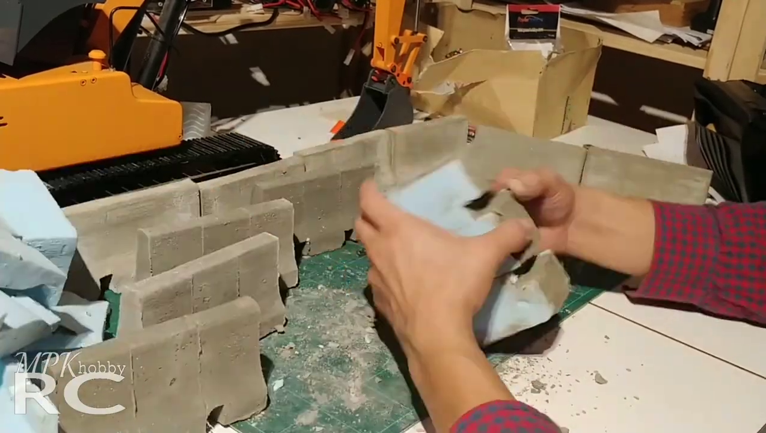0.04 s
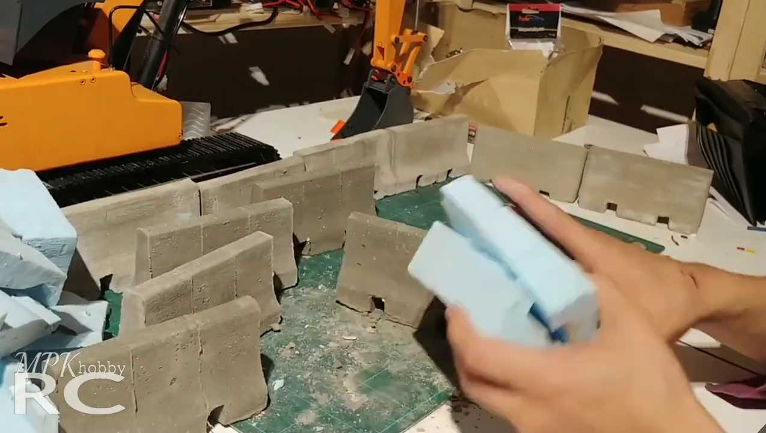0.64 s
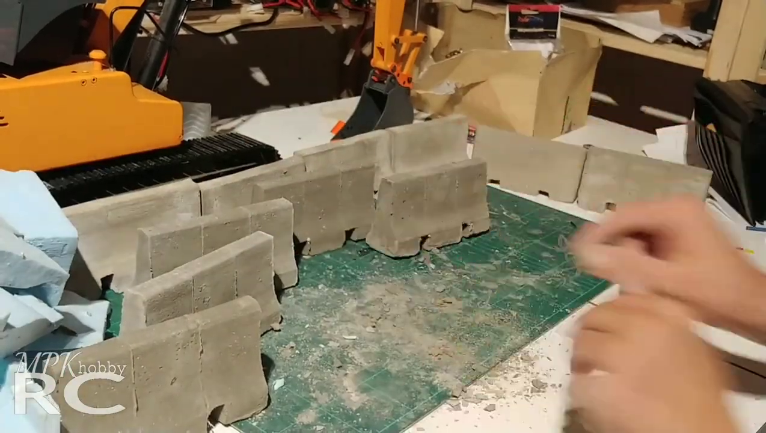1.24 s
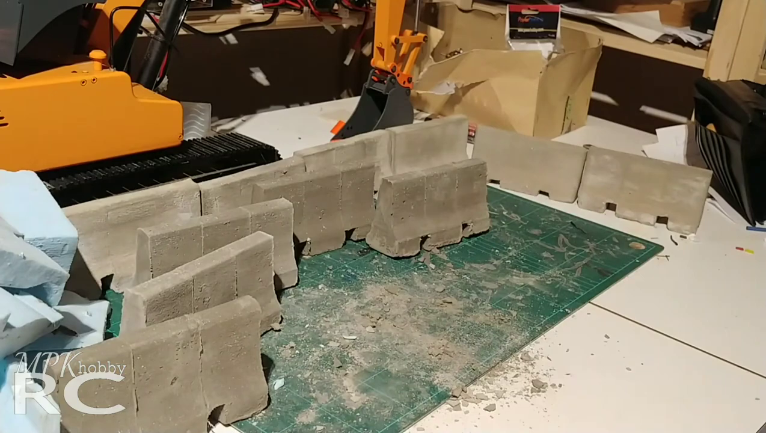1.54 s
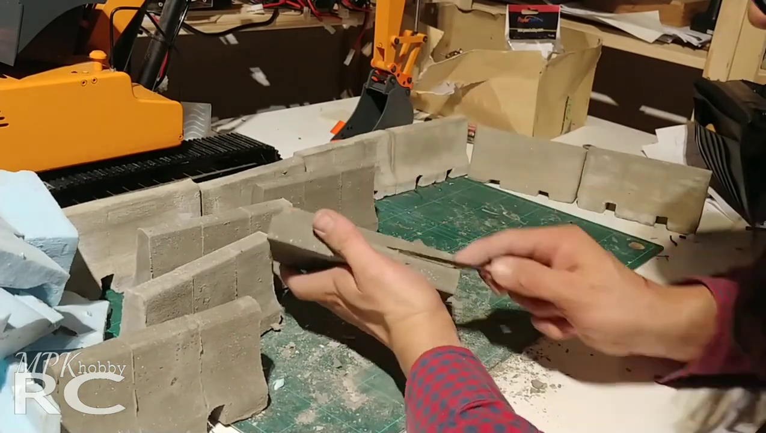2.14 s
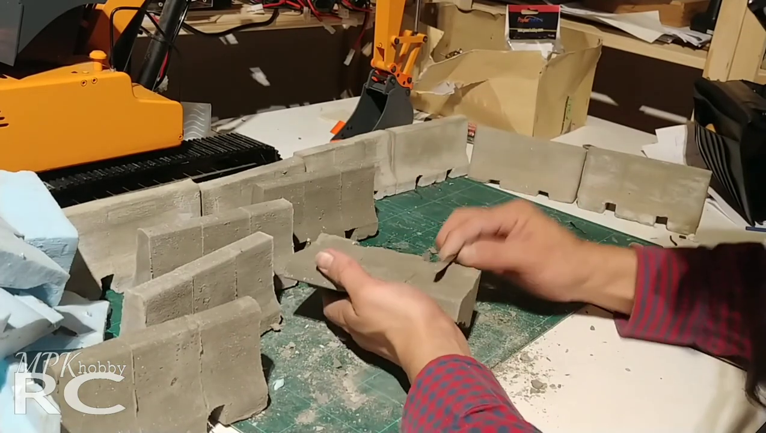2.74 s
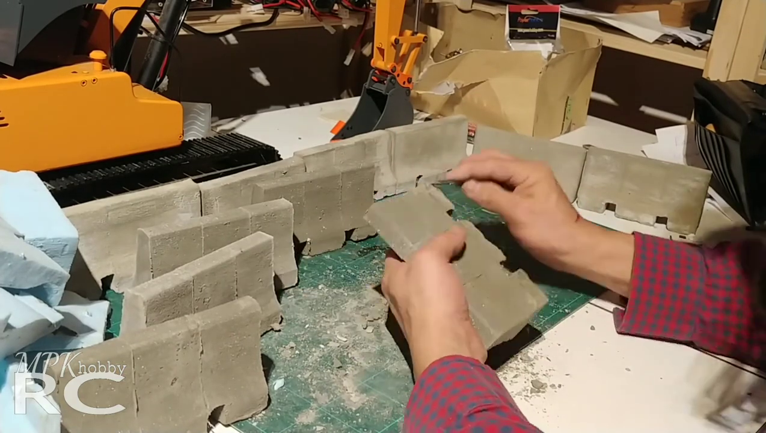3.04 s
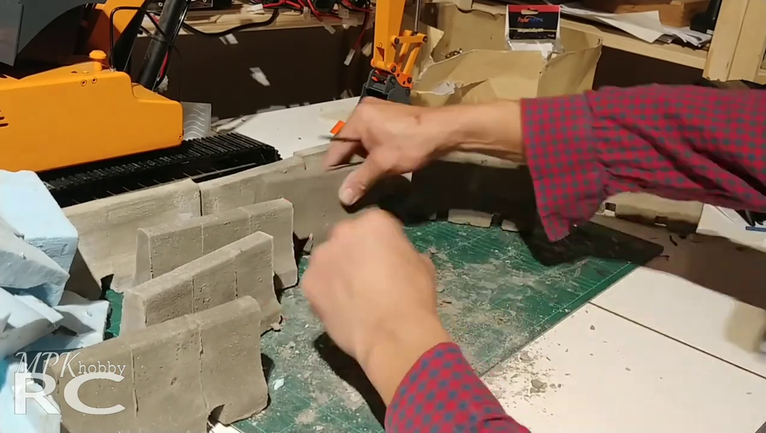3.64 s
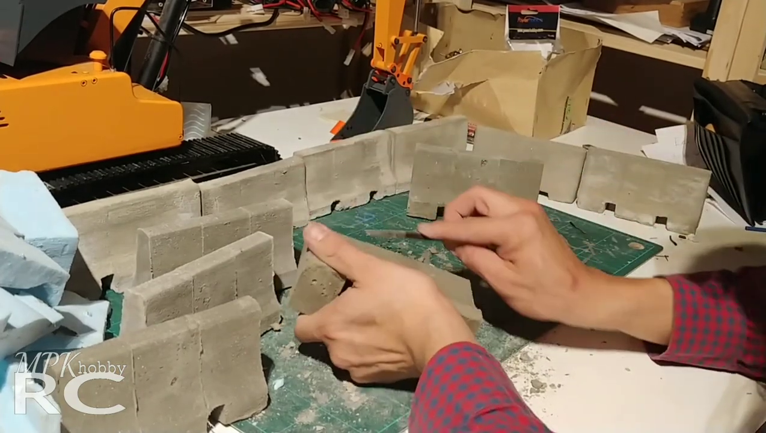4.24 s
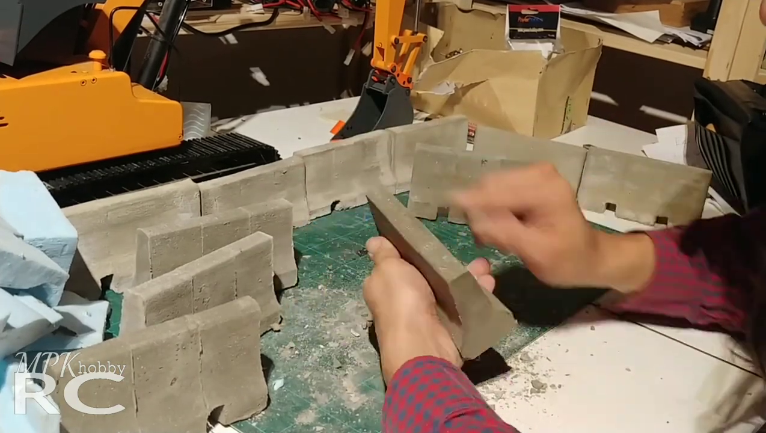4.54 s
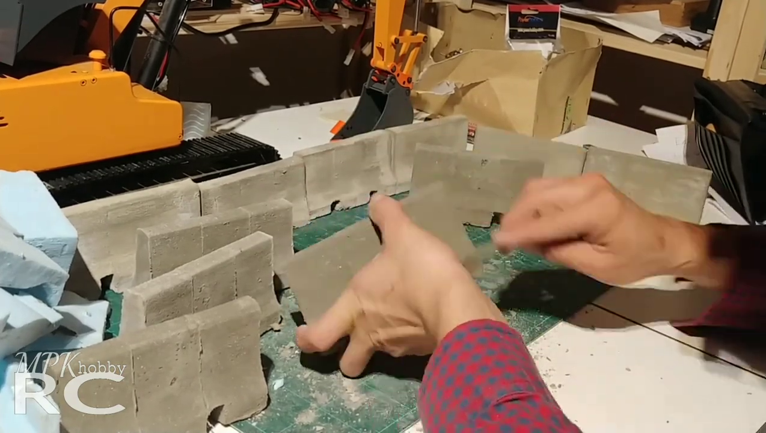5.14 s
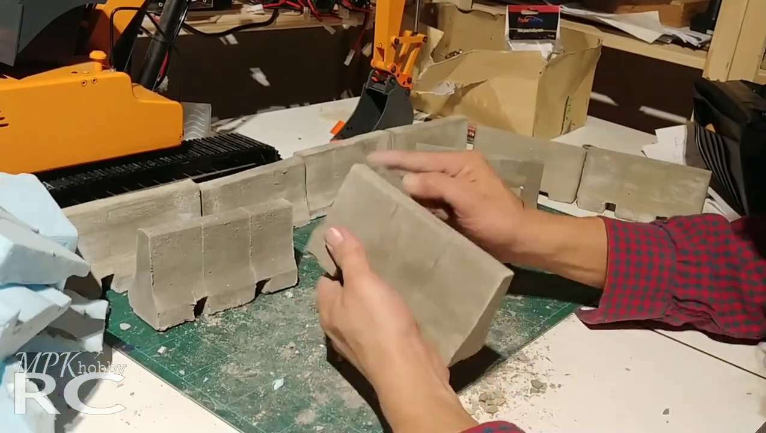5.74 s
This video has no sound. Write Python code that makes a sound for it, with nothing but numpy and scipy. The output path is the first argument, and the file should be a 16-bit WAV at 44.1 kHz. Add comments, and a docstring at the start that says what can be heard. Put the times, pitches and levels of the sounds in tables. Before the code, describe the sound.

Foam rubs dryly against a small cement piece as it comes out of its mold, and the piece lands on a workbench mat with a sharp clack. After a few soft bumps, a small tool scrapes its edges in quick strokes, with clicks and brief pings as burrs snap off. A dull thud interrupts, then grittier scraping resumes. The sound is close, a little to the left, in a quiet room.

```python
"""Demoulding and deburring cement

A small cast cement barrier is pulled from its squeezing foam mould, clacks down and thuds on a bench mat.
Then a small tool scrapes the burrs off the pieces in quick strokes; each rings briefly, damped by the hand.
Sleeves rustle in a quiet, cluttered room. The stereo image is close, its right side shaded from the work."""
import sys
import numpy as np
from scipy import signal
from scipy.fft import rfft, irfft, next_fast_len
from scipy.io import wavfile
from scipy.ndimage import map_coordinates

SR = 44100
rng = np.random.default_rng(int(sys.argv[2]) if len(sys.argv) > 2 else 0)


def generate_wav(signal):
    """Clip the signal to [-1, 1] and save it as 16-bit WAV at the path in sys.argv[1]."""
    frames = np.transpose(np.atleast_2d(signal))
    scaled = np.clip(frames, -1, 1) * 32767
    pcm = np.round(scaled).astype(np.int16)
    wavfile.write(sys.argv[1], SR, pcm)


N = 255780

# Firm strokes of the tool: (centre [s], level [dB], half length [s])
FIRM_STROKES = [(1.616, -49, .011), (1.68, -49, 0.0055), (1.779, -54.5, 0.0076), (1.841, -50, 0.0034),
                (1.875, -46, 0.0097), (1.915, -51.5, 0.0065), (2.179, -48.5, .015), (2.311, -40.5, 0.01),
                (2.383, -40, 0.01), (2.448, -34.5, 0.0062), (2.522, -35, 0.012), (2.568, -31.5, 0.0084),
                (2.614, -41.5, 0.0092), (2.703, -33, 0.018), (2.773, -29, 0.012), (2.856, -35.5, 0.028),
                (2.917, -36, 0.005), (2.96, -47, 0.0097), (3.028, -43.5, 0.0041), (3.119, -57, 0.0087),
                (3.219, -45, 0.004), (3.823, -46.5, 0.0086), (3.894, -44.5, 0.016), (3.977, -40, 0.014),
                (4.055, -44.5, .019), (4.194, -44.5, 0.017), (4.427, -49, 0.011), (4.448, -53.5, 0.019),
                (4.49, -50.5, 0.011), (4.542, -44.5, 0.0061), (4.583, -50.5, 0.0052), (4.617, -47.5, 0.017),
                (4.696, -37.5, 0.014), (4.746, -55.5, 0.0049), (4.886, -42.5, 0.0097), (4.91, -38, 0.009),
                (4.962, -45, 0.015), (5.027, -53, 0.017), (5.161, -54.5, 0.01), (5.213, -45.5, 0.011),
                (5.261, -52.5, 0.0031), (5.552, -32.5, 0.0064), (5.59, -44.5, 0.022),
                (5.635, -41.5, 0.0097), (5.685, -45, 0.0034), (5.753, -45, 0.0046), (5.777, -34, 0.0084)]
# Edges worked in turn: (start [s], end [s], lowest mode [Hz], brightness [dB], grit [dB], light strokes [dB])
WORKED_EDGES = [(1.596, 1.93, 2085, 1.5, -23, -59), (2.147, 2.421, 2068, -8, -22.5, -56.5),
                (2.434, 2.79, 2016, -5, -27.5, -50.5), (2.807, 3.05, 2024, -9.5, -31.5, -58.5),
                (3.094, 3.25, 2090, -6, -28, -63), (3.773, 3.93, 1749, -9, -10, -55),
                (3.939, 4.3, 1800, .5, -11, -60), (4.365, 4.77, 1860, 0, -6, -58),
                (4.849, 5.1, 1654, -11.5, -39, -57), (5.143, 5.38, 1670, -3.5, -15, -61.5),
                (5.532, 5.71, 2328, 0, -17, -55.5), (5.716, 5.8, 2345, -7.5, -38.5, -50)]
# The tool catches on a burr: (time [s], level [dB])
BURR_CATCHES = [(2.375, -29.5), (2.557, -28), (2.697, -20), (2.704, -22), (2.71, -22), (2.7945, -23.5),
                (2.855, -42), (2.8744, -23), (3.777, -50), (3.989, -28.5), (4.443, -37), (4.696, -34),
                (4.875, -41.5), (5.534, -24.5), (5.749, -37)]
# Ring of the piece, one list per hold: (frequency [Hz], width before hand damping [Hz], level [dB])
PIECE_MODES = [
    [(2060, 40, 15), (930, 180, 1), (3592, 45, 1), (4720, 31, -6), (5270, 130, -17), (7220, 62, -9.5),
     (8200, 70, -17), (9000, 63, -20.5)],
    [(2000, 69, 3), (2960, 21, -16.5), (3068, 43, -9.5), (3550, 70, -13.5), (4570, 87, -15),
     (5420, 79, -13.5), (5900, 55, -19), (7320, 35, -25), (7700, 30, -46)],
    [(1700, 55, 14), (2184, 110, -6.5), (2576, 37, 3.5), (2940, 81, -0.5), (3820, 88, -5), (4790, 26, -5),
     (5520, 79, -8.5), (5920, 24, -14.5), (7870, 250, -17.5), (7930, 63, -38)],
    [(2310, 57, 16.5), (3720, 168, -3), (4153, 46, 3.5), (5340, 96, -3), (6500, 33, -4.5), (6970, 73, -10),
     (7880, 250, -15.5)],
]
# The ring of the worked piece changes to the next list: (time [s])
HOLD_CHANGES = [2.05, 3.6, 5.45]
# Gritty hiss of scraping, also the colour of the sleeves: (frequency [Hz], level [dB])
GRIT_COLOUR = [(60, -21.5), (250, -8.5), (700, -3.5), (1200, 4), (2200, 1.5), (4000, -1), (5700, -6),
               (6600, -10), (8000, -8), (8800, -17.5), (11000, -18), (12500, -29.5)]
# Cement knocks on cement: (time [s], level [dB], brightness [dB], t60 [s])
CEMENT_CLACKS = [(0.246, -35, -16, 0.066), (0.724, -25, -15, 0.11), (0.736, -6.5, -21, .034),
                 (0.7405, -9.5, -5, 0.051), (0.773, -22, -0.5, .018), (1.034, -57, -18.5, 0.084),
                 (1.273, -49.5, -9, 0.048), (3.304, -52.5, -15.5, 0.033), (3.508, -57.5, -7, 0.12)]
# Colour of a clack: (frequency [Hz], level [dB])
CEMENT_COLOUR = [(20, -48), (60, -37.5), (280, -22.5), (405, -5), (520, -16.5), (750, -11.5), (1000, -9),
                 (1350, 0.5), (1750, 0), (2200, -8.5), (2700, -8), (4200, -12), (5400, -17.5),
                 (7500, -24.5), (12000, -46.5)]
# Dull bumps on the mat or in the hands: (time [s], level [dB], tone centre [Hz], contact cutoff [Hz])
SOFT_BUMPS = [(0.248, -36, 220, 920), (0.381, -35, 900, 1250), (0.404, -28.5, 148, 565),
              (0.445, -46, 120, 200), (0.596, -57, 290, 397.6), (0.735, -37.5, 408, 480),
              (0.767, -49.5, 120, 402), (0.803, -52, 200, 580), (1.033, -32.5, 288, 426),
              (1.264, -44.5, 159, 1310), (1.345, -45, 270, 500), (1.451, -53.5, 417, 1410),
              (1.525, -50, 400, 1400), (2.087, -48.5, 121, 169), (2.696, -51.5, 500, 1160),
              (2.972, -53, 110, 920), (3.299, -52.5, 960, 1304), (3.413, -60, 400, 710),
              (3.498, -26, 265, 550), (3.509, -25, 138.7, 1220), (3.596, -46.5, 280, 385),
              (4.388, -56, 115, 185), (4.99, -47, 524, 1309), (5.045, -54.5, 464, 890),
              (5.564, -51, 170, 450), (5.61, -54.5, 326, 450)]
# Body of the bench top: (frequency [Hz], width [Hz], level [dB])
BENCH_MODES = [(66.16, 25, -16.5), (129, 10, -9.5), (272, 290, -6.5), (416, 68, -5), (556, 60, -9),
               (859, 140, -7), (1060, 470, -5)]
# Foam, fingers and dusty mat slide on cement: (centre [s], level [dB], half length [s], brightness [dB])
FOAM_RUBS = [(0.019, -42.5, 0.007, 8), (0.044, -48, 0.015, 38), (0.119, -56.5, 0.018, 25),
             (0.214, -47, 0.018, -7.5), (0.268, -52, 0.023, 1), (0.396, -23, .011, -6.5),
             (0.511, -52, 0.0087, -17), (0.579, -44.5, .017, 9), (0.622, -45.5, 0.011, 1),
             (0.654, -49, 0.0082, -1.5), (0.699, -57, 0.02, -9), (0.931, -70, .022, 5),
             (1.095, -51, .014, 0), (1.187, -65, 0.0056, 14), (1.32, -61.5, 0.027, -5),
             (1.373, -57.5, 0.032, -2), (1.464, -55, 0.0076, -15.5), (1.55, -60.5, 0.024, -8.5),
             (3.419, -76, 0.03, 5.5), (3.636, -63, 0.027, -4), (5.024, -57, 0.037, -10.5)]
# Colour of a rub: (frequency [Hz], level [dB])
FOAM_COLOUR = [(60, -17), (300, -13.5), (700, -4), (1100, 8), (1600, 1.5), (2200, -7), (4500, -4),
               (6200, -13), (7600, -10), (9500, -17.5), (11500, -24.5), (12500, -36.5)]
# Movement of hands and sleeves: (time [s], rumble [dB], rustle [dB])
HANDLING_LEVELS = [(0.0, -71, -97), (0.34, -63.5, -70), (0.61, -77.5, -62.5), (0.89, -80, -84),
                   (1.66, -73, -95), (2.12, -74.5, -72.5), (2.47, -64, -68.5), (2.7, -74, -84),
                   (2.96, -66.5, -75), (3.21, -74.5, -72), (3.71, -69, -82.5), (4.04, -69, -75.5),
                   (4.23, -66.5, -77), (4.59, -70, -76.5), (4.7, -71.5, -71.5), (5.57, -74.5, -84.5),
                   (5.72, -72, -77), (5.8, -65, -74)]
# Shading of the right microphone for work in the hands: (frequency [Hz], gain [dB])
HAND_SHADE = [(100, 16.5), (350, 1.2), (630, -3), (1130, -2.5), (2040, -9.5), (3660, -15), (6600, -32.5),
              (12000, -13.5)]
# The same for blows on the mat: (frequency [Hz], gain [dB])
MAT_SHADE = [(100, 3.5), (350, -2), (630, 1), (1130, -4.5), (2040, -10), (3660, -19), (6600, -28.5),
             (12000, -20)]
# Decay of the room: (frequency [Hz], t60 [s])
ROOM_DECAY = [(100, 0.095), (400, 0.13), (2000, 0.047), (10000, 0.0067)]
# Room tone: (frequency [Hz], level [dB])
HUSH_COLOUR = [(15, -34.5), (25, -5.5), (115, 3), (231, -7), (314, -3.5), (513, -9), (648, -28),
               (1970, -17), (4610, -27.5), (6460, -35), (7740, -26), (12000, -32), (15600, -68),
               (22000, -120)]

FRAME = 16384  # samples in one event
T = np.arange(FRAME) / SR
HZ = np.fft.rfftfreq(FRAME, 1 / SR)
CENTRE_S = T[FRAME // 2]


def scraping(grip_drift=0.013, brighter_per_db=0.21, mean_stroke_db=-40):
    """The tool scrapes the cement: light strokes mostly hiss, deep ones ring the piece."""
    out = np.zeros(N)
    for s, db, half_s in FIRM_STROKES + light_strokes():
        lowest_hz, treble_db, grit_db = edge_at(s)
        light_db = brighter_per_db * (mean_stroke_db - db)
        lowest_hz *= 1 + grip_drift * rng.standard_normal()
        body = held_piece(s, lowest_hz, grit_db + light_db)
        friction = grains(spread_db=3.5, per_s=1100)
        sound = contact(friction, swell(half_s, shape=1.34), body, treble_db + light_db - 1.5)
        add(out, s - CENTRE_S, amp(db - 1) * sound)
    return out


def light_strokes(per_s=29, half_s=0.0078, scatter_db=2.5):
    """Stroke rows for the tool brushing to and fro along each edge at an uneven pace."""
    rows = []
    for start, end, *_, db in WORKED_EDGES:
        times = np.arange(start + 0.5 / per_s, end, 1 / per_s)
        for s, (late, force) in zip(times, rng.standard_normal((40, 2))):
            rows.append((s + 0.15 * late / per_s, db + scatter_db * force, half_s))
    return rows


def edge_at(s):
    """Lowest mode, brightness and grit of the edge worked nearest to time s."""
    return min(WORKED_EDGES, key=lambda edge: max(edge[0] - s, s - edge[1]))[2:5]


def held_piece(s, lowest_hz, grit_db, spot_db=5.5, detune=0.011, damping=1.72, grip_damping=1.9):
    """Colour of the piece: the grip damps it, the spot touched weights its upper modes, grit adds hiss."""
    (_, lowest_width, lowest_db), *upper = PIECE_MODES[np.searchsorted(HOLD_CHANGES, s)]
    modes = [(lowest_hz, grip_damping * lowest_width, lowest_db)]
    for hz, width, db in upper:
        hz *= 1 + detune * rng.standard_normal()
        modes.append((hz, damping * width, db + spot_db * rng.standard_normal()))
    surface = amp(grit_db + along(GRIT_COLOUR, HZ)) * unevenness(depth_db=6, spacing_hz=199)
    return np.hypot(resonances(modes, steep=1.537), surface)


def burr_snaps(jolt=3, jolt_s=0.0001, t60=0.034, duller_db=9):
    """A burr snaps off with one short jolt and some crumbs, and the piece pings."""
    out = np.zeros(N)
    for s, db in BURR_CATCHES:
        lowest_hz, treble_db, grit_db = edge_at(s)
        force = grains(spread_db=0.5, per_s=9600) + jolt * np.exp(-T / jolt_s)
        body = held_piece(s, lowest_hz, grit_db - 10)
        add(out, s, amp(db - 1.5) * contact(force, amp(-60 * T / t60), body, treble_db - duller_db))
    return out


def cement_clacks():
    """Cement hits cement: hard, crumbly blows with hardly any ring."""
    out = np.zeros(N)
    colour = amp(along(CEMENT_COLOUR, HZ)) * unevenness(depth_db=0.5, spacing_hz=71.3)
    for s, db, treble_db, t60 in CEMENT_CLACKS:
        crush = amp(-60 * T / t60) * (1 - np.exp(-T / (t60 / 70)))
        add(out, s, amp(db + 1.5) * contact(grains(spread_db=3.5, per_s=2100), crush, colour, treble_db))
    return out


def bench_thuds(rise_s=0.0086, rattle_db=-4, rattle_db_per_octave=2.2, falloff_db=10.5, spot_db=3.5):
    """The mat softens each blow: the bench swings in the modes near one tone; harder hits rattle more."""
    out = np.zeros(N)
    mode_hz, _, mode_db = np.transpose(BENCH_MODES)
    mode_rise_s = rise_s * (296 / mode_hz[:, None]) ** 0.1  # low modes swing longer
    push = lambda peak_s: (T / peak_s * np.exp(1 - T / peak_s)) ** 1.4
    swings = np.sqrt(2) * push(mode_rise_s) * np.sin(2 * np.pi * mode_hz[:, None] * T)
    for s, db, tone_hz, cutoff_hz in SOFT_BUMPS:
        octaves_off = np.abs(np.log2(mode_hz / tone_hz))
        spot = spot_db * rng.standard_normal(len(mode_hz))
        weights = lowpass(mode_hz, cutoff_hz) * amp(mode_db - falloff_db * octaves_off + spot)
        tone = weights @ swings / np.linalg.norm(weights)
        burst = rng.standard_normal(FRAME) * push(rise_s) ** 2
        rattle = coloured(burst, resonances(BENCH_MODES) * lowpass(HZ, cutoff_hz))
        rattle = unit(rattle) * rms(push(rise_s))
        share = amp(rattle_db + rattle_db_per_octave * np.log2(cutoff_hz / tone_hz))
        add(out, s, amp(db) * (tone + share * rattle) / np.hypot(1, share))
    return out


def foam_rubs():
    """Foam drags over the cement with a dry rasp."""
    out = np.zeros(N)
    for s, db, half_s, treble_db in FOAM_RUBS:
        colour = amp(along(FOAM_COLOUR, HZ)) * unevenness(depth_db=1.5, spacing_hz=190)
        rasp = contact(grains(spread_db=1.5, per_s=900), swell(half_s, shape=1.66), colour, treble_db - 3)
        add(out, s - CENTRE_S, amp(db) * rasp)
    return out


def handling():
    """Hands and sleeves keep up a faint, restless rumble and rustle."""
    s, rumble_db, rustle_db = np.transpose(HANDLING_LEVELS)
    t = np.arange(N) / SR
    restless = lambda per_s: map_coordinates(rng.standard_normal(int(N * per_s / SR) + 4), [t * per_s])
    dull_bench = lambda hz: np.interp(hz, HZ, resonances(BENCH_MODES)) / (1 + (hz / 900) ** 2)
    rumble = unit(filtered(rng.standard_normal(N), dull_bench))
    rustle = unit(filtered(rng.standard_normal(N), lambda hz: amp(along(GRIT_COLOUR, hz))))
    rumble *= amp(np.interp(t, s, rumble_db) - 4 + 0.53 * restless(37))
    rustle *= amp(np.interp(t, s, rustle_db) + 2.3 * restless(57))
    return rumble + rustle


def reflections(x):
    """A short answer from the shelves and walls, different on each side."""
    hz, t, noise = signal.stft(rng.standard_normal((2, SR // 3)), SR, nperseg=256)
    decay = amp(-60 * t / along(ROOM_DECAY, hz)[:, None])
    tail = signal.istft(noise * decay, SR, nperseg=256)[1]
    predelayed = np.pad(x, ((0, 0), (SR // 300, 0)))
    return signal.fftconvolve(predelayed, tail / np.linalg.norm(tail[0]), axes=1)[:, :N]


def room_tone(split_hz=700):
    """The steady hush of the workshop, centred in the bass and wide above."""
    noise = rng.standard_normal((3, N))
    colour = lambda hz: amp(along(HUSH_COLOUR, hz)) / np.hypot(hz, split_hz)
    wide = filtered(noise[:2], lambda hz: colour(hz) * hz)
    centred = filtered(noise[2], lambda hz: colour(hz) * split_hz)
    return unit(wide + centred)


def contact(force, envelope, body, treble_db, split_hz=3300):
    """A shaped force sounds through a body; treble_db balances the energy above and below the split."""
    dull = lowpass(HZ, split_hz)
    sharp = np.sqrt(1 - dull ** 2)
    balance = np.linalg.norm(body * dull) / np.linalg.norm(body * sharp) * amp(treble_db)
    sound = coloured(force * envelope, body * np.hypot(dull, balance * sharp))
    return unit(sound) * rms(envelope)


def grains(spread_db, per_s):
    """Friction: noise whose strength jumps from one sand grain to the next."""
    sizes = amp(spread_db * rng.standard_normal(FRAME))
    return rng.standard_normal(FRAME) * sizes[(T * per_s).astype(int)]


def swell(half_s, shape):
    """A stroke's pressure rises and falls round the centre of the frame."""
    return np.exp(-0.75 * np.abs((T - CENTRE_S) / half_s) ** shape)


def resonances(modes, steep=1):
    """Gain of a set of modes; steep over 1 deepens the valleys between them."""
    peaks = [amp(db) * np.abs(HZ * width / (hz ** 2 - HZ ** 2 + 1j * HZ * width)) ** steep
             for hz, width, db in modes]
    return np.linalg.norm(peaks, axis=0)


def unevenness(depth_db, spacing_hz):
    """Many small, close resonances that differ from one point of contact to the next."""
    knots = rng.standard_normal(FRAME // 16)
    return amp(depth_db * map_coordinates(knots, [HZ / spacing_hz], mode="mirror"))


def from_left(x, lag_ms, shade):
    """Sound from the left reaches the right microphone a little later and duller."""
    right = filtered(x, lambda hz: amp(along(shade, hz)) * np.exp(-2j * np.pi * hz * lag_ms / 1000))
    return np.array([x, right])


def coloured(x, gain):
    """Minimum-phase EQ on one event, so nothing rings ahead of the attack."""
    cepstrum = irfft(np.log(np.maximum(np.r_[gain[1], gain[1:]], 1e-6)))
    cepstrum[1:FRAME // 2] *= 2
    cepstrum[FRAME // 2 + 1:] = 0
    return irfft(rfft(x) * np.exp(rfft(cepstrum)))


def filtered(x, response):
    """A whole track through a frequency response."""
    size = next_fast_len(N + SR // 2)
    return irfft(rfft(x, size) * response(np.fft.rfftfreq(size, 1 / SR)), size)[..., :N]


def lowpass(hz, cutoff_hz, order=4):
    """Gain of a flat-topped treble cut."""
    return 1 / np.sqrt(1 + (hz / cutoff_hz) ** (2 * order))


def along(points, hz):
    """A curve read on a log frequency axis."""
    point_hz, values = np.transpose(points)
    return np.interp(np.log(hz + 1), np.log(point_hz + 1), values)


def add(track, s, sound):
    """Mix a sound into the track from time s on."""
    start = round(s * SR)
    a, b = max(start, 0), min(start + len(sound), N)
    track[a:b] += sound[a - start:b - start]


def amp(db):
    """Decibels to gain."""
    return 10 ** (np.asarray(db) / 20)


def rms(x):
    """Average signal strength."""
    return np.sqrt(np.mean(x ** 2) + 1e-30)


def unit(x):
    """Scaled to rms 1."""
    return x / rms(x)


def scene():
    """The tool works nearly in front; the mould and the blows on the mat sit further left."""
    hands = from_left(scraping() + burr_snaps() + handling(), lag_ms=0.13, shade=HAND_SHADE)
    mould = from_left(foam_rubs(), lag_ms=0.42, shade=HAND_SHADE)
    mat = from_left(cement_clacks() + bench_thuds(), lag_ms=0.43, shade=MAT_SHADE)
    work = hands + mould + mat
    return work + amp(-17) * reflections(work) + amp(-73.5) * room_tone()


def record(dry):
    """Soft clipping rounds the hardest peaks, and a steep cut takes off the top treble."""
    rounded = dry / (1 + np.abs(dry / 0.8) ** 4) ** (1 / 4)
    return filtered(rounded, lambda hz: lowpass(hz, cutoff_hz=12400, order=40))


dry = scene()
out = record(dry)
generate_wav(out)
```